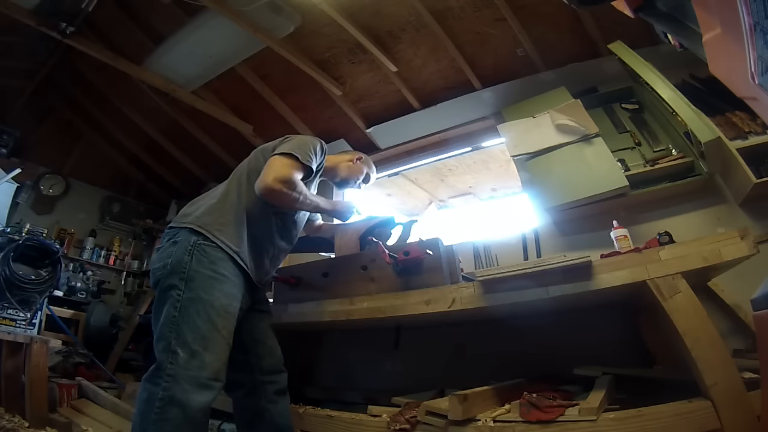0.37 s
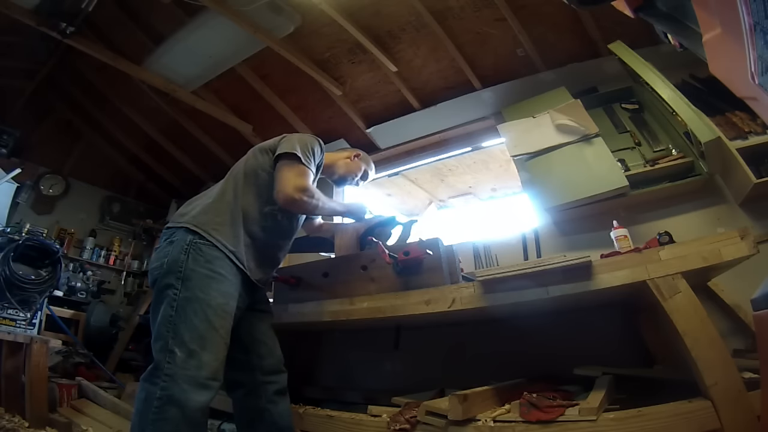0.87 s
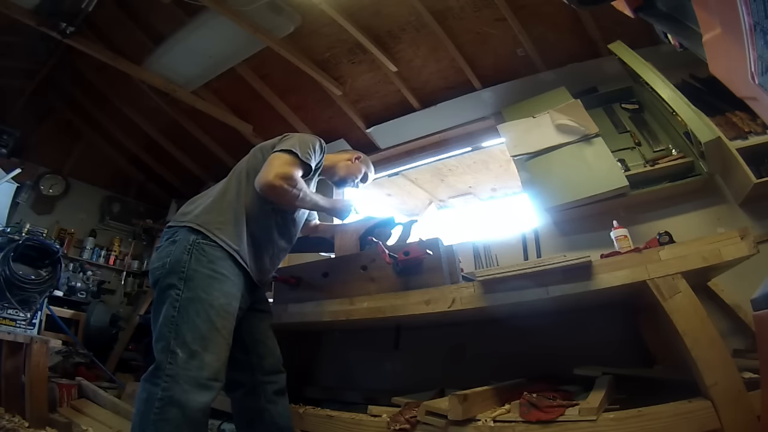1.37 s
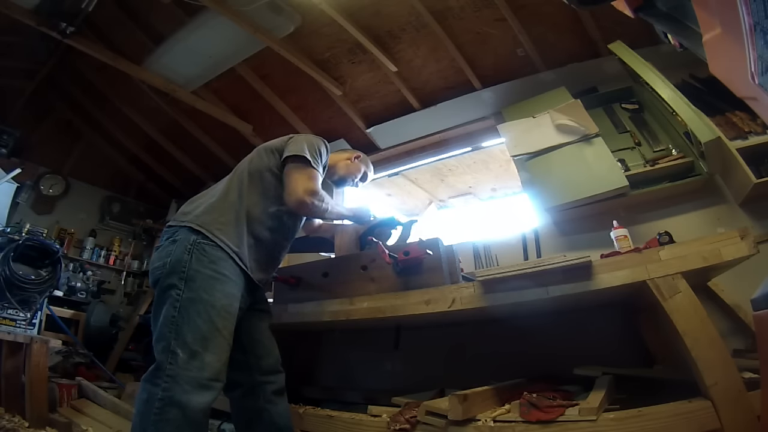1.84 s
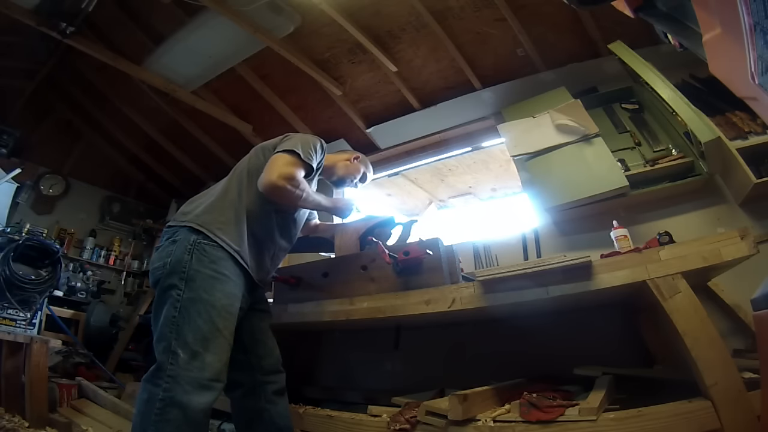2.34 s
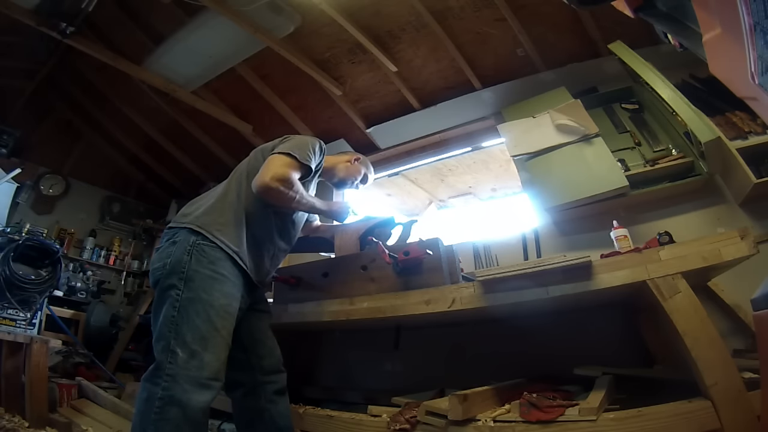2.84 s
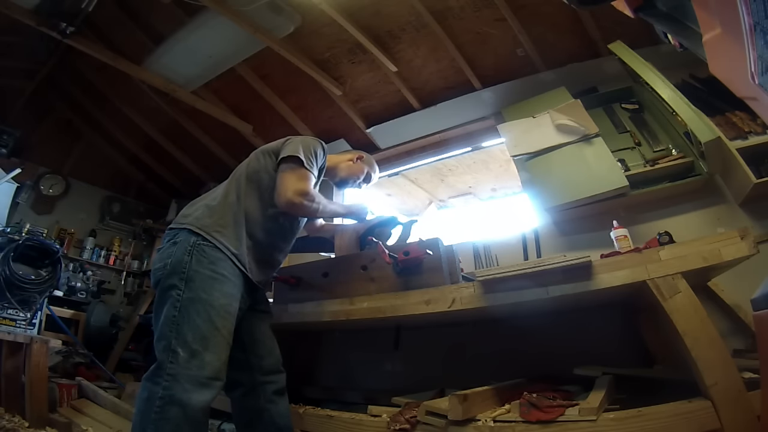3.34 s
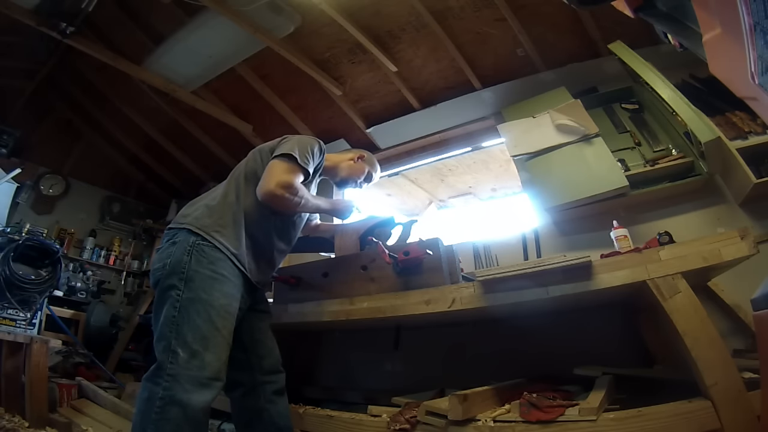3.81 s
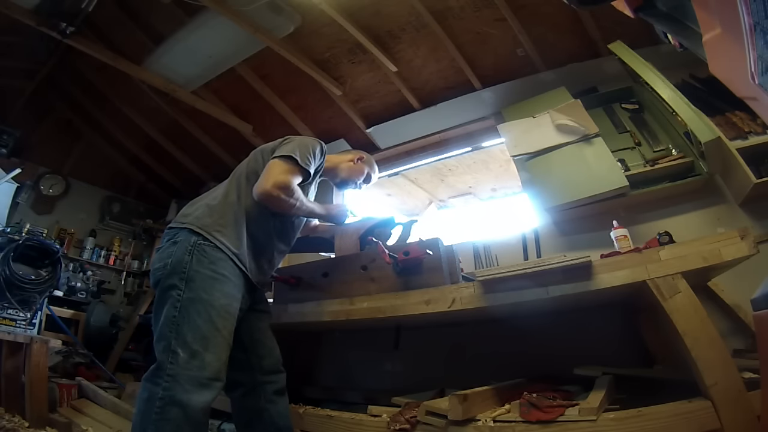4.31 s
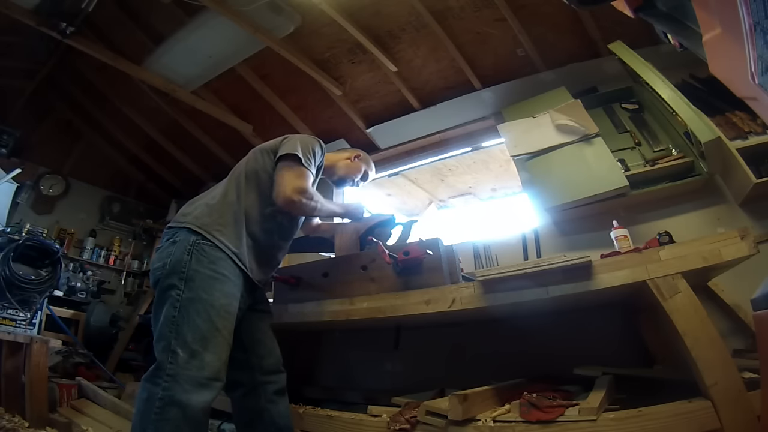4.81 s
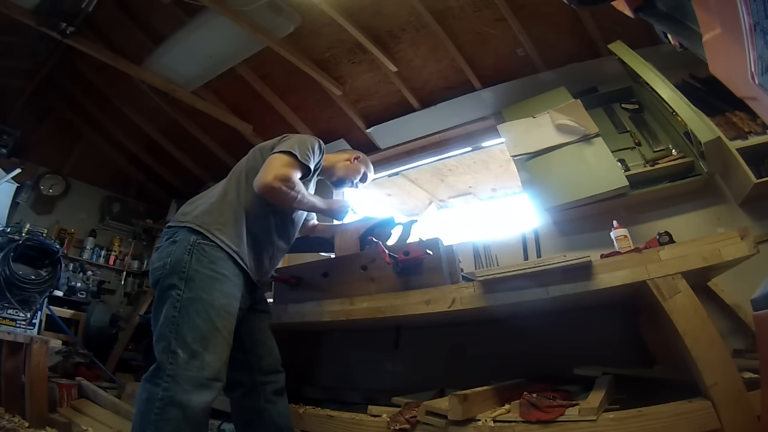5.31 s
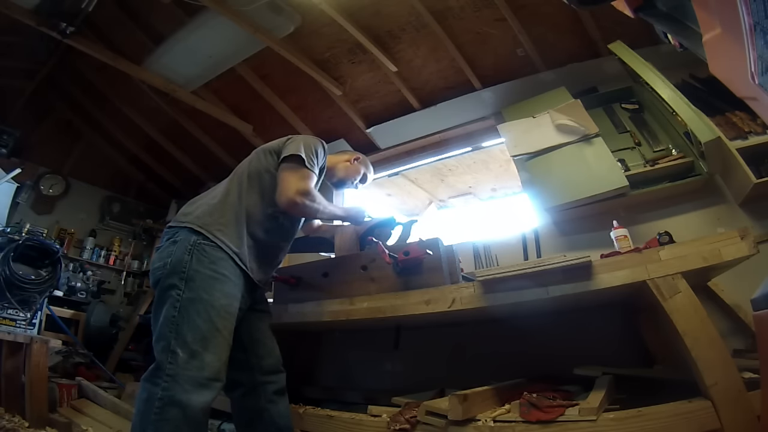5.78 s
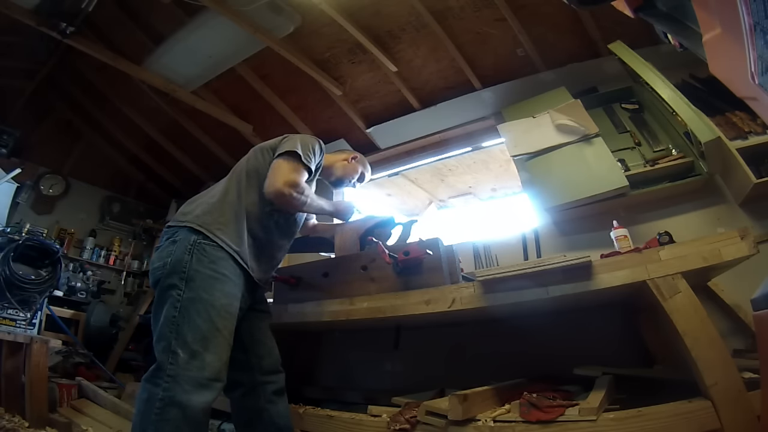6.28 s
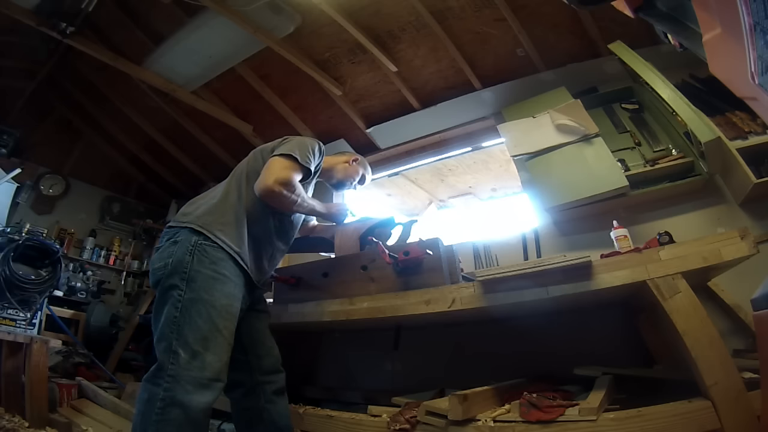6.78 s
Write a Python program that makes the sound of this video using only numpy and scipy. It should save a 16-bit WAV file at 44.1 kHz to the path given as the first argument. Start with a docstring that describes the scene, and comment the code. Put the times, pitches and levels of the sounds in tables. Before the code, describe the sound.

Rough wood planing at a bench, close up: short scraping strokes about every one and a half seconds, the workpiece humming hollowly and the bench rumbling beneath. In the pauses the tool scuffs and knocks on wood, tiny metal clinks cluster, and a faint high rattle flickers. One sharp splintering snap stands out near the middle, a weaker one follows later. Quiet low hum, faint high hiss and short wooden-room echo; the last stroke is cut off.

```python
"""A wooden shed: a small hand plane is pushed six times along a wooden edge clamped to a bench.
Tearing fibres shake workpiece, clamp and bench; the shaving hisses and light scuffs fall between strokes.
A loose metal part tinkles, the plane knocks on the wood, a faint high rattle comes and goes, and twice
something snaps sharply. Tinkles and snaps are near and mostly direct; the shed echoes around them.
A quiet room hum lies below, with a faint flickering high hiss over it; a low-pass cuts the very top."""
import sys
import numpy as np
from scipy import signal
from scipy.fft import rfft, irfft
from scipy.io import wavfile

SR = 44100
rng = np.random.default_rng(int(sys.argv[2]) if len(sys.argv) > 2 else 0)


def attenuation_scalar(level_db):
    """Turn a level in dB into a linear amplitude multiplier (20 dB per decade)."""
    decades = np.asarray(level_db, float) / 20
    return 10 ** decades


def digitize_waveform(pressure):
    """Quantize a signal to 16-bit integers and store it at the path in sys.argv[1].

    Rows of a 2-D input are taken as channels; values are limited to [-1, 1].
    """
    field = np.atleast_2d(pressure).T
    bounded = np.clip(field, -1, 1)
    quanta = np.round(bounded * 32767).astype(np.int16)
    wavfile.write(sys.argv[1], SR, quanta)


N = 304290  # samples, 6.9 s

# All levels below are those before the final mix in scene().
# Room hum spectrum: (frequency [Hz], density [dB per Hz])
HUM_SPECTRUM = [(12, 7), (20, 3.5), (109, 0.5), (135, -38), (169, -10), (200, -1), (289, -3), (1820, -19.5),
                (2270, -19.5), (7000, -29.5), (9100, -76), (15400, -120)]
# Faint flickering high hiss over the hum: (frequency [Hz], density [dB per Hz])
HIGH_HISS_SPECTRUM = [(3820, -20.5), (6500, -56), (7050, -4), (7790, 2.5), (9550, -3.5), (10600, 1.5),
                      (11700, -8), (13000, 1), (14700, -5), (15200, 9.5), (15700, -24)]
# Resonances of bench, workpiece, planed edge and clamp: (frequency [Hz], width [Hz], level [dB])
BENCH_MODES = [(27, 8.5, -9), (62.7, 36, -5), (106.4, 12.6, -7), (149, 34.6, 2), (182.3, 11, -5.5)]
WORKPIECE_MODES = [(397, 30, -11), (443, 24, -10), (472, 24, 1), (514, 22, -3), (568, 30, -12),
                   (615, 34, -14), (672, 32, -11), (750, 45, -12)]
EDGE_MODES = [(819, 57, 7), (882.3, 50, 6.5), (948.4, 46, 9), (1002.6, 47, 8), (1098, 56, 8),
              (1196, 262, 1), (1421, 147, -0.5), (1559, 59, 6), (1710, 110, -5), (1941, 295, -3.5),
              (2030, 48, 3), (2080, 310, -7.5)]
CLAMP_MODES = [(229, 12, -13.5), (289, 42, -2.5)]
# Hiss of the shaving: (frequency [Hz], density [dB per Hz])
SHAVING_SPECTRUM = [(1410, -5), (2400, -5), (2900, -6), (3290, -0.5), (3610, -4), (3850, -7), (4580, -11),
                    (5150, -11), (5890, -13), (7570, -11.5), (10100, -20), (10900, -20.5), (13300, -25),
                    (15100, -27), (15700, -45)]
# Six strokes, one curve each: (time [s], workpiece ring [dB], cutting rasp [dB])
STROKES = [
    [(0.2, -60, -63), (0.24, -47.5, -52.5), (0.488, -26, -36), (0.528, -25, -30.5), (0.604, -25, -26),
     (0.718, -22.5, -31.5), (0.86, -48.5, -56.5), (0.896, -44, -75), (1.0, -79, -80)],
    [(1.485, -64, -64), (1.529, -31.5, -34.5), (1.603, -25.5, -31), (1.687, -27.5, -31.5),
     (1.713, -21, -28), (1.745, -28, -30.5), (1.811, -26, -32), (1.939, -50.5, -52), (2.0, -51, -66)],
    [(2.92, -42, -48.5), (2.97, -33, -39.5), (3.136, -28, -29.5), (3.164, -27, -29.5), (3.172, -27, -29),
     (3.232, -29, -31.5), (3.296, -40.5, -45.5), (3.364, -45, -40.5), (3.47, -68, -85)],
    [(4.33, -49, -56), (4.416, -37, -36.5), (4.462, -25.5, -34.5), (4.512, -35, -33.5), (4.542, -26, -31),
     (4.61, -32.5, -34), (4.666, -25, -33.5), (4.842, -57, -61.5), (4.9, -64, -71)],
    [(5.52, -49, -59), (5.544, -48, -47.5), (5.676, -25.5, -30), (5.848, -30.5, -31), (5.866, -25, -34),
     (5.954, -41.5, -53), (5.964, -42, -47), (6.086, -60, -63), (6.1, -84, -75)],
    [(6.735, -85, -77), (6.755, -37, -45.5), (6.795, -29, -39.5), (6.84, -28, -32), (6.9, -23.5, -30.5)],
]
# How much each stroke shakes clamp and bench, relative to the workpiece: (clamp [dB], bench [dB])
STROKE_SHAKE = [(-3.5, 0), (-1, -1.5), (1.5, 0), (5, 2.5), (-1, 2.5), (-2.5, 1.5)]
# Light scuffs of the plane between strokes: (start [s], length [s], workpiece [dB], rasp [dB])
SCUFFS = [(0.057, 0.043, -66, -56), (1.152, 0.084, -45, -60.5), (1.27, 0.064, -51, -51),
          (1.309, 0.19, -47, -55.5), (1.482, 0.035, -56, -49), (2.001, 0.048, -45, -58),
          (2.257, 0.15, -52, -72), (2.531, 0.05, -39.5, -55), (2.717, 0.16, -50.5, -54),
          (4.038, 0.27, -55.5, -62), (4.176, 0.2, -49, -56.5), (4.765, 0.055, -52, -39.5),
          (4.984, 0.088, -51, -52), (5.297, 0.05, -59, -54.5), (5.332, 0.17, -56, -56.5),
          (6.509, 0.18, -45.5, -45), (6.64, 0.05, -44, -51.5), (6.742, 0.03, -60, -46)]
# Touches of the loose metal part:
# (time [s], peak [dB], t60 [s], second mode [dB relative], tick [dB relative])
TINKLES = [(0.4703, -53, 0.1, -23, -4), (0.8889, -52, 0.033, -35, -7), (1.4476, -53.5, 0.096, -30, 0),
           (1.6137, -49, 0.16, -26, -11), (2.0053, -42, 0.087, -26, -9), (2.012, -42, 0.056, -18, -2.5),
           (2.0234, -44.5, 0.11, -19, -14), (2.0857, -66, 0.067, -20, -2), (2.3268, -36.5, 0.2, -22, -7),
           (2.3536, -42, 0.11, -16, -10), (2.3728, -54, 0.12, -22, -7), (2.4024, -60, 0.093, -18, -8),
           (2.5656, -54, 0.036, -21, -15), (2.6525, -42.5, 0.058, -20, -10), (2.6713, -46, 0.057, -28, -9),
           (2.8769, -54, 0.069, -21, -9), (2.9886, -38.5, 0.094, -19, -8), (3.0076, -37, 0.12, -29, -8),
           (3.0184, -43, 0.12, -27, -6), (3.3045, -53.5, 0.087, 3, 8.5), (3.33, -48, 0.068, -10, -4),
           (3.338, -57, 0.08, -10, 3), (4.14, -58, 0.048, -8, 5), (5.2659, -49.5, 0.045, -28, -15),
           (5.3243, -63, 0.05, -19, -3), (5.3898, -40, 0.15, -13, -3.5), (5.4135, -36.5, 0.16, -42, -18),
           (5.4519, -55, 0.08, -24, -10), (5.4789, -38.5, 0.049, -40, -17), (5.5064, -60, 0.05, -20, -6),
           (5.6391, -44, 0.064, -28, -14), (6.4173, -50, 0.078, -31, -10), (6.6832, -53.5, 0.061, -22, -15)]
# Modes of the metal part: (frequency [Hz], level [dB relative], share of the touch's t60 [ratio])
METAL_MODES = [(8970, 5, 0.8), (13020, -1, 1.7), (14500, 4, 1.1), (6030, -16.5, 0.52)]
# Partials of the tick at each touch: (frequency [Hz], level [dB relative])
TICK_PARTIALS = [(4300, -31), (4900, 2.5), (7300, -10), (7750, -7.5), (8100, 13), (8500, 9), (10200, -14),
                 (11200, 3), (12200, 0)]
# Contacts of the faint high rattle: (time [s], peak [dB], pitch [Hz])
RATTLE_CONTACTS = [(0.812, -50, 5500), (1.263, -56, 4800), (1.298, -53.5, 4950), (4.086, -48, 5800),
                   (4.0976, -48, 5380), (4.113, -51, 5640), (4.1235, -54, 5500), (4.1939, -54, 4880),
                   (4.2328, -58, 5830), (5.2914, -59, 5700)]
# Dull knocks on the wood: (time [s], peak [dB], pitch [Hz])
KNOCKS = [(0.887, -30.5, 750), (1.158, -50, 530), (1.26, -33.5, 940), (1.284, -31.5, 760),
          (1.343, -31.5, 500), (1.492, -38, 460), (1.528, -20.5, 527), (2.019, -45, 514), (2.328, -41, 342),
          (2.54, -38, 460), (2.935, -30.5, 483), (4.028, -48, 318), (4.195, -46, 487), (4.228, -39, 392),
          (5.305, -43, 470), (5.388, -38, 495), (5.544, -29.5, 472), (6.511, -28.5, 940), (6.742, -51, 453)]
# Sharp snaps: (time [s], crack [dB rms], crack t60 [s], scatter [dB rms], thud [dB],
# crack spectrum as (frequency [Hz], density [dB per Hz]))
SNAPS = [(2.789, -12, 0.0071, -32.5, -8.5, [(530, -37), (900, 5), (1040, -9), (1270, 1), (1700, -2.5),
         (2430, -5.5), (3050, -13), (3320, -9), (4750, -4), (5550, -2), (8970, -8), (10700, -6),
         (11700, -10), (13300, -12), (15700, -35)]), (2.8037, -19, 0.0042, -66, -66, [(5000, -13),
         (9000, -19), (10600, 3), (13000, -15), (15800, -26)]),
         (4.983, -27.5, 0.024, -46.5, -27, [(350, -51), (600, -38), (1070, -5), (1440, -33), (1520, -50),
         (1970, -9), (2810, -38), (3090, -26), (4180, -35), (5720, -15), (6390, -24), (14700, -41),
         (15700, -52)])]
# Thud of the wood under a snap: (frequency [Hz], level [dB relative], t60 [s])
THUD_MODES = [(285, 3.5, 0.018), (457, -15, 0.1), (496, -2, 0.02), (602, 17, 0.012), (722, -10, 0.05),
              (830, -4, 0.055)]
# Ring of the two snapped parts, loud then soft: (frequency [Hz], level [dB], t60 [s])
LOUD_RING = [(1220, -19, 0.012), (2410, -23, 0.017), (4250, -13, 0.01), (5050, -12, 0.0087),
             (6720, -19, 0.0099), (10730, -7, 0.0066)]
SOFT_RING = [(1050, -46, .06), (2070, -47, 0.12), (3540, -40, 0.035), (5620, -51, 0.099),
             (6000, -51, 0.024), (1260, -38, .02)]
# Echo bands of the shed: (frequency [Hz], t60 [s], echo [dB])
SHED_BANDS = [(246, 0.11, 14), (820, 0.38, -1.5), (2500, 0.3, -5.5), (5930, 0.13, -1.5), (11900, 0.1, -15)]


def rms_one(x):
    """Scale to rms 1."""
    return x / np.sqrt(np.mean(x ** 2) + 1e-20)


def coloured(x, points):
    """Shape by a (Hz, dB) spectrum, straight on a log frequency axis; rms 1."""
    hz, level_db = np.transpose(points)
    grid_hz = np.maximum(np.arange(len(x) // 2 + 1) * SR / len(x), 1)
    gain = attenuation_scalar(np.interp(np.log(grid_hz), np.log(hz), level_db))
    return rms_one(irfft(rfft(x) * gain, len(x)))


def drift(rate_hz):
    """Slow random wander of spread 1: noise through two equal one-pole low-passes."""
    r = np.exp(-2 * np.pi * rate_hz / SR)
    wander = signal.lfilter([1], [1, -2 * r, r * r], rng.standard_normal(N + SR))
    return rms_one(wander[SR:])  # the first second settles the filter


def resonate(x, peaks):
    """Parallel resonances of alternating sign, each passed twice so that the valleys stay dark; rms 1."""
    out = np.zeros(N)
    for k, (hz, width_hz, level_db) in enumerate(peaks):
        r = np.exp(-np.pi * width_hz / SR)
        section = [1 - r * r, 0, r * r - 1, 1, -2 * r * np.cos(2 * np.pi * hz / SR), r * r]
        out += (-1) ** k * attenuation_scalar(level_db) * signal.sosfilt([section, section], x)
    return rms_one(out)


def add(out, s, hz, level_db, t60, length=None, rise_s=0.00027):
    """Add a dying sine at time s, ended after its t60 or, if given and sooner, after length seconds."""
    t = np.arange(int(SR * min(max(t60, 0.002), length or 9))) / SR
    i = int(s * SR)
    envelope = attenuation_scalar(level_db - 60 * t / t60) * (1 - np.exp(-t / rise_s))
    ring = envelope * np.sin(2 * np.pi * hz * t)
    out[i:i + len(t)] += ring[:N - i]


def hum_and_high_hiss():
    """Steady room hum wavers slightly; over it a faint high hiss flickers faster."""
    hum_gain = attenuation_scalar(-54 + 1.2 * drift(12))
    hiss_gain = attenuation_scalar(-70.5 + 2.5 * drift(40))
    hum = hum_gain * coloured(rng.standard_normal(N), HUM_SPECTRUM)
    return hum + hiss_gain * coloured(rng.standard_normal(N), HIGH_HISS_SPECTRUM)


def contact():
    """Gains of workpiece, rasp, clamp, bench and hiss drive: strokes, scuffs, resting hand add in power."""
    t = np.arange(N) / SR
    source = [0, 1, 0, 0, 1]  # each gain follows the workpiece column (0) or the rasp column (1)
    resting_db = np.array([-78, -76])  # hand on the tool between contacts: workpiece, rasp
    power = np.ones((5, N)) * attenuation_scalar(resting_db)[source, None] ** 2
    for rows, shake_db in zip(STROKES, STROKE_SHAKE):
        s, *columns = np.transpose(rows)
        levels_db = np.array([np.interp(t, s, c) for c in columns])[source]
        levels_db[2:4] += np.array(shake_db)[:, None]
        during = (t >= s[0]) * (t <= s[-1])
        power += during * attenuation_scalar(levels_db) ** 2
    rise_s, fall_db = 0.01, 16.5  # a scuff sets in fast and fades by fall_db over its length
    for s, length, *levels_db in SCUFFS:
        age = np.maximum(t - s, 0)
        shape = (1 - np.exp(-age / rise_s)) * attenuation_scalar(-fall_db * (age / length) ** 2)
        gains = attenuation_scalar(np.array(levels_db))[source]
        gains[-1] *= attenuation_scalar(4)  # a scuff skims the surface and is brighter than a cut
        power += (gains[:, None] * shape) ** 2
    return np.sqrt(power)


def late(level, lag_s):
    """One-pole smoothing: a heavy part answers late."""
    r = np.exp(-1 / (max(lag_s, 0.001) * SR))
    return signal.lfilter([1 - r], [1, -r], level)


def fibres(per_s, spread_db, chatter_db):
    """Fibres tear as dense clicks of uneven size; the blade chatters, so they come in clumps."""
    sizes = attenuation_scalar(spread_db * np.minimum(rng.exponential(1, N), 4)) * rng.choice([-1, 1], N)
    torn = rng.random(N) < per_s / SR
    chatter = attenuation_scalar(chatter_db * (drift(112) + 0.68 * drift(33)))
    return sizes * torn * chatter + 1e-18


def plane():
    """Tearing fibres drive workpiece, edge and clamp; with finer ones they make hiss and shake the bench."""
    work, cut, clamp_drive, bench_drive, skim = contact()
    hiss = attenuation_scalar(-47) * skim / attenuation_scalar(-32.5)  # -47 dB at a hiss drive of -32.5 dB
    # The heavy bench follows late and never quite rests; the clamp rings unevenly.
    rumble = attenuation_scalar(-12) * late(bench_drive, lag_s=0.053) + attenuation_scalar(-63 + 2.7 * drift(10))
    clamp = attenuation_scalar(-10 + 1.5 * drift(12)) * late(clamp_drive, lag_s=0.027)
    tearing = fibres(2400, spread_db=3.0, chatter_db=1.5)
    fine = rms_one(fibres(9000, spread_db=-1.5, chatter_db=1.35)) + 0.59 * rms_one(tearing)
    bright = cut * resonate(tearing, EDGE_MODES) + hiss * coloured(fine, SHAVING_SPECTRUM)
    deep = work * resonate(tearing, WORKPIECE_MODES) + clamp * resonate(tearing, CLAMP_MODES)
    return bright, deep + rumble * resonate(fine, BENCH_MODES)


def tinkles(tick_t60=0.0079):
    """Each touch ticks unevenly, stops the old ring (but for its longest mode) and starts a new one."""
    out = np.zeros(N)
    ends = [row[0] for row in TINKLES[1:]] + [N / SR]
    chances_db = rng.normal(0, 3, (len(TINKLES), len(TICK_PARTIALS)))
    for (s, peak_db, t60, second_db, tick_db), end, chance_db in zip(TINKLES, ends, chances_db):
        top_db = -11 + 0.4 * second_db  # the top mode partly follows the second
        for (hz, level_db, share), own_db in zip(METAL_MODES, [0, second_db, top_db, 0]):
            length = end - s if share < 1.5 else None
            add(out, s, hz, peak_db + level_db + own_db, share * t60, length)
        for (hz, level_db), own_db in zip(TICK_PARTIALS, chance_db):
            add(out, s, hz, peak_db + tick_db + level_db + own_db, tick_t60)
    return out


def rattle():
    """Each contact rings a cluster of short modes, mostly close, whose pitches stray a little."""
    out = np.zeros(N)
    strays = rng.normal(0, 0.011, (len(RATTLE_CONTACTS), 4))
    for (s, peak_db, hz), chance in zip(RATTLE_CONTACTS, strays):
        for ratio, level_db, stray in zip([0.95, 1, 1.04, 1.4], [-11.0, 0.5, -17.0, -7.0], chance):
            add(out, s, (ratio + stray) * hz, peak_db + level_db, t60=0.025)
    return out


def knocks():
    """A knock rings briefly at its own pitch and at two overtones of the wood."""
    out = np.zeros(N)
    for s, peak_db, hz in KNOCKS:
        for ratio, level_db, t60 in [(1, -4, 0.031), (1.9, -9.5, 0.013), (3.7, -11, 0.0043)]:
            add(out, s, ratio * hz, peak_db + level_db, t60)
    return out


def snaps(scatter_t60=0.27):
    """A crack of splintering noise scatters off nearby boards; the thud of the wood swells a few ms later."""
    out = np.zeros(N)
    t = np.arange(SR // 4) / SR
    for s, crack_db, crack_t60, scatter_db, thud_db, spectrum in SNAPS:
        i = int(s * SR)
        shape = attenuation_scalar(crack_db - 60 * t / crack_t60) + attenuation_scalar(scatter_db - 60 * t / scatter_t60)
        out[i:i + len(t)] += shape * coloured(rng.standard_normal(len(t)), spectrum)
        for hz, level_db, t60 in THUD_MODES:
            add(out, s + 0.00384, hz, thud_db + level_db, t60, rise_s=0.009)
    for s, modes in [(2.789, LOUD_RING), (4.983, SOFT_RING)]:
        for hz, level_db, t60 in modes:
            add(out, s, hz, level_db, t60)
    return out


def shed(x, first_echo_s=0.0048):
    """The direct sound plus dense echoes: noise that dies away band by band."""
    t = np.arange(SR // 2) / SR
    tail = np.zeros(len(t))
    for hz, t60, echo_db in SHED_BANDS:
        edges_hz = [hz / 2.34, min(hz * 1.3, 0.45 * SR)]
        band = signal.butter(2, edges_hz, "band", fs=SR, output="sos")
        noise = signal.sosfilt(band, rng.standard_normal(len(t)))
        dying = noise * attenuation_scalar(-60 * t / t60) * (t > first_echo_s)
        tail += attenuation_scalar(echo_db) * dying * np.sqrt(18 / t60 / SR)  # a longer decay starts lower
    return x + signal.fftconvolve(x, tail)[:N]


def scene():
    """Deep resonances carry their own ring, near sharp sounds are mostly direct; the rest echoes in the shed."""
    bright, deep = plane()
    near = tinkles() + snaps()
    in_shed = shed(0.43 * bright + knocks() + rattle() + 0.44 * near)
    direct = 0.5 * bright + 0.35 * near
    return (direct + in_shed + deep + hum_and_high_hiss())[None]


def roll_off(x):
    """The treble ends steeply here."""
    return signal.sosfilt(signal.butter(12, 15890, fs=SR, output="sos"), x)


def record(dry):
    """A low-pass cuts the very top: 40 dB down from 15750 Hz upwards."""
    top_cut = signal.cheby2(10, 40, 15750, fs=SR, output="sos")
    return roll_off(signal.sosfilt(top_cut, dry))


dry = scene()
out = record(dry)
digitize_waveform(out)
```